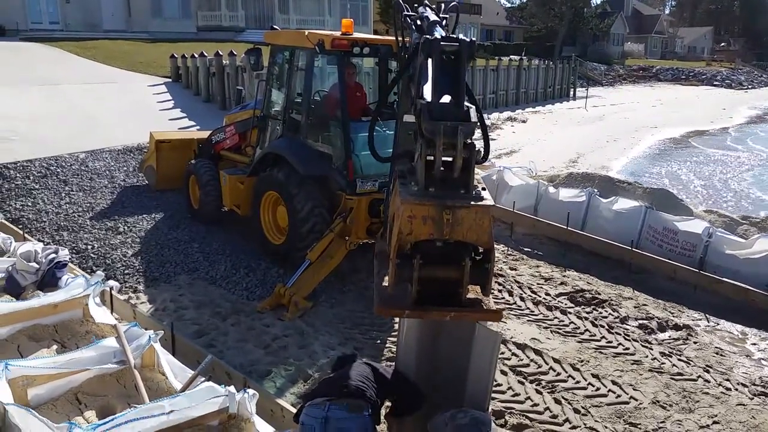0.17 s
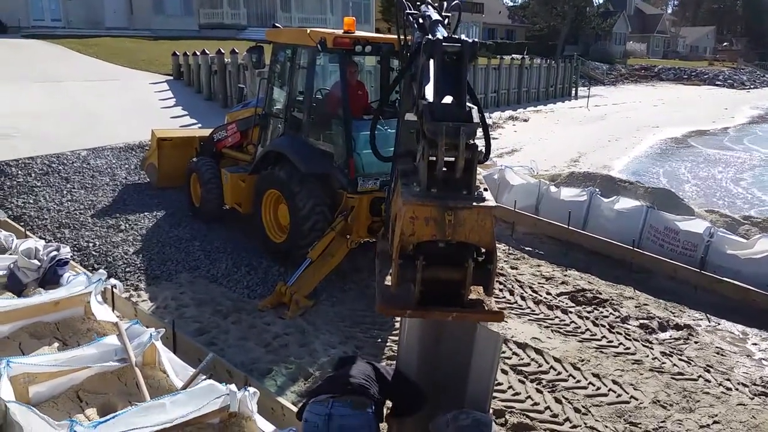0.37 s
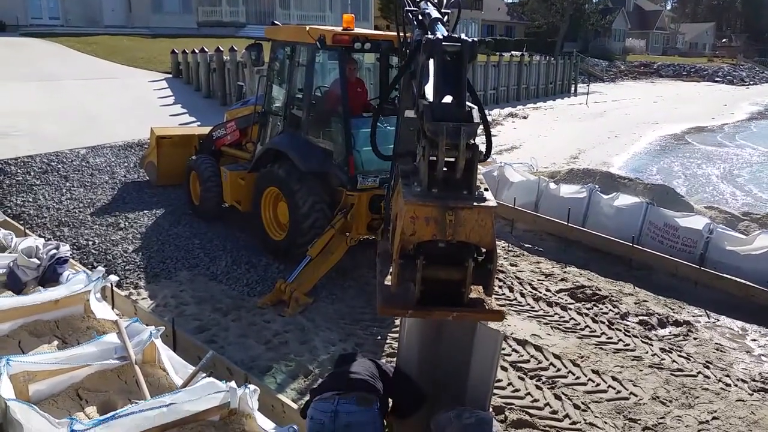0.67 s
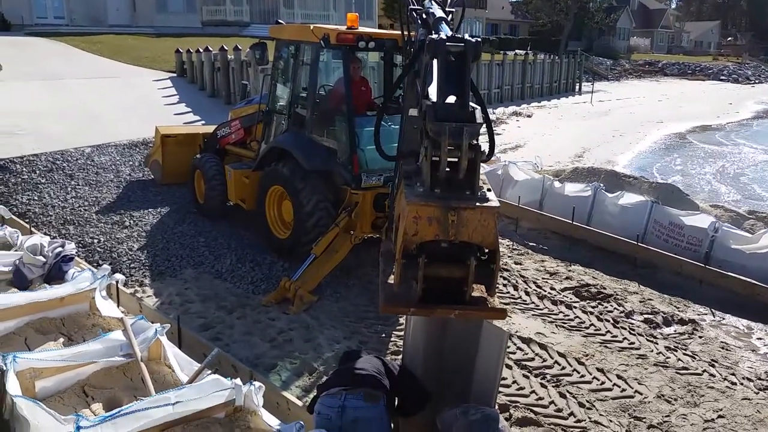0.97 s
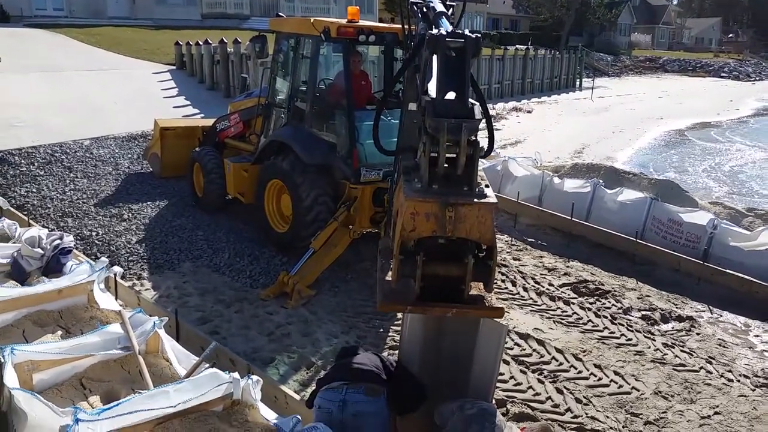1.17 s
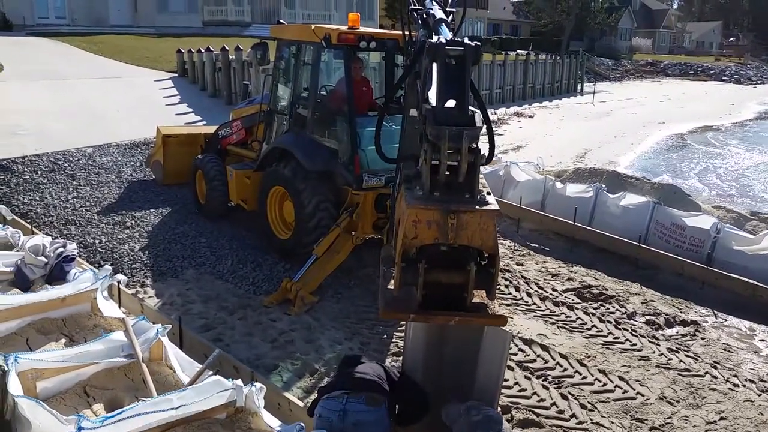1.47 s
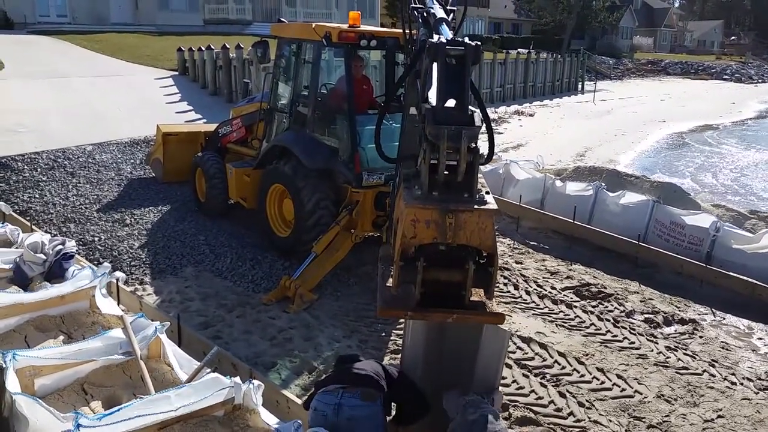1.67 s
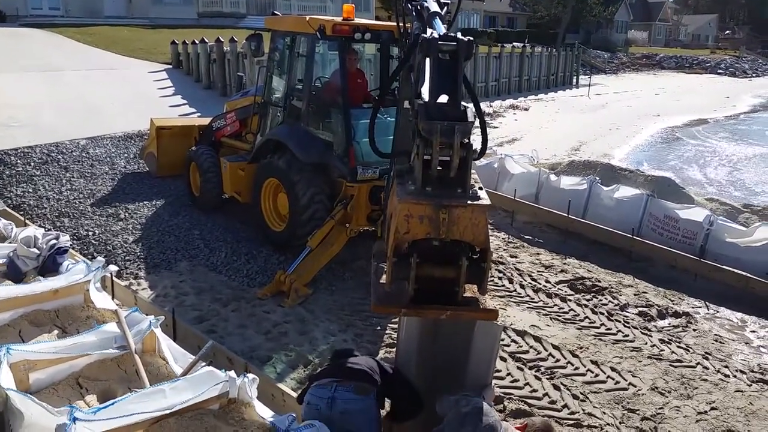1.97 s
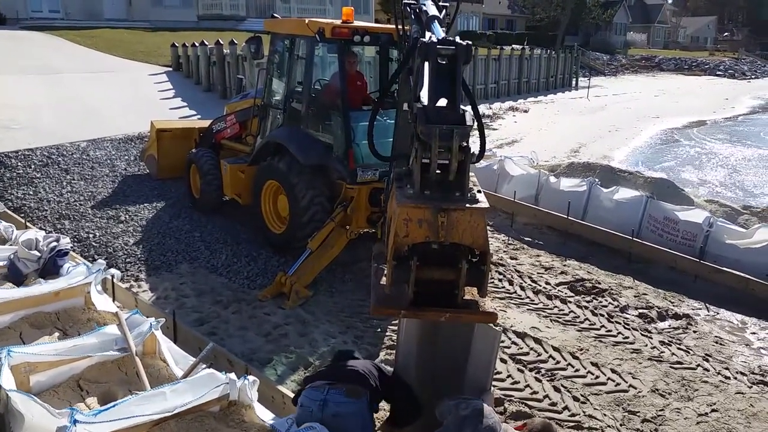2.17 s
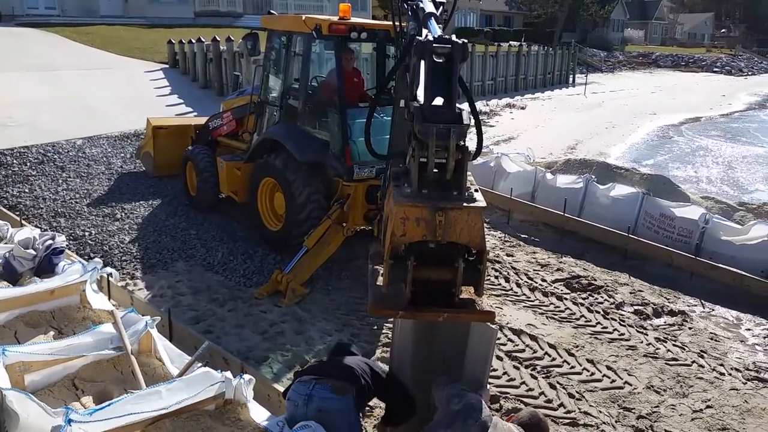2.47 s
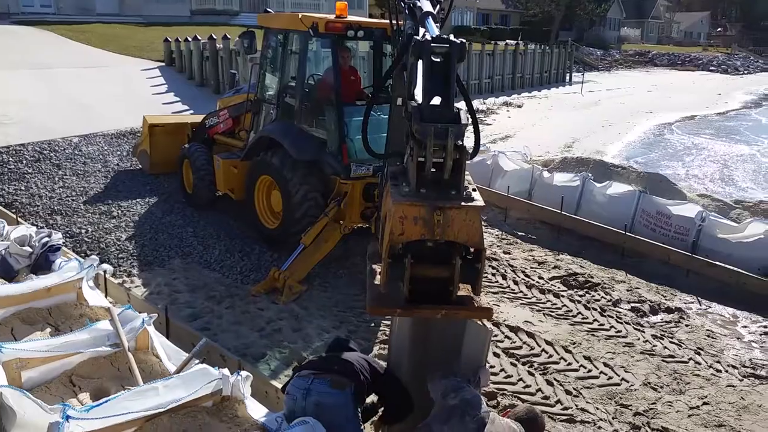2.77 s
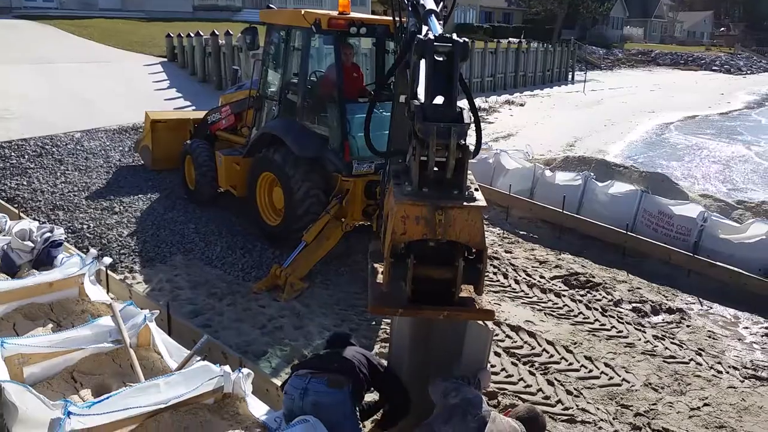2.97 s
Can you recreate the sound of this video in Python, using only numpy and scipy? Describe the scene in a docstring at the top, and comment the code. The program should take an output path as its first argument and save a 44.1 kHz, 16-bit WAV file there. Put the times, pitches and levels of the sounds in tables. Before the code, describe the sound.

A vibrating plate drives sheet steel into sand throughout, with dull low thuds about seventeen times a second, slightly irregular. Harsh bright rattling, sizzle and thin ringing clanks run densely until 1.3 seconds, thin out until about 1.9, then return, with strong clanks around 2.4-2.6, continuing to the end at 3.1. A diesel drones and roars steadily beneath; low wind buffeting slowly eases. Dry, open-air, close stereo sound, left treble differently coloured.

```python
"""Vibrating plate driving sheet steel

A vibrating plate on a backhoe arm drives steel sheet into a beach. Each landing excites a low ground resonance;
loose steel rattles as noise under sizzle, chatter and clank envelopes, and rings in narrow modes.
The diesel is shaped noise, an exhaust drone and a roar of panels; wind rumbles separately on two microphone
ports, which colour the treble very differently."""
import sys
import numpy as np
from scipy import signal
from scipy.fft import rfft, irfft, next_fast_len
from scipy.io import wavfile
from scipy.ndimage import uniform_filter1d, map_coordinates

SR = 44100
rng = np.random.default_rng(int(sys.argv[2]) if len(sys.argv) > 2 else 0)


def gain_from_db(level_db):
    """Turn a decibel level (scalar or array-like) into a linear amplitude factor."""
    decades = np.asarray(level_db, float) / 20
    return 10 ** decades


def int16_out(signal):
    """Quantize to a 16-bit WAV file."""
    q = np.round(np.clip(np.atleast_2d(signal).T, -1, 1) * 32767)
    wavfile.write(sys.argv[1], SR, q.astype(np.int16))


N = 137151  # samples, 3.11 s


def unit(x):
    """Normalisation: scales a signal to rms 1."""
    return x / np.sqrt(np.mean(x ** 2) + 1e-20)


def along(points, hz, column=1):
    """Interpolation: reads a column of a table on a log frequency axis."""
    p = np.transpose(points)
    return np.interp(np.log(hz + 1), np.log(p[0] + 1), p[column])


def wobble(rate):
    """Slow random modulation: a spline through random knots, rate of them a second."""
    knots = rng.standard_normal(int(N * rate / SR) + 4)
    return map_coordinates(knots, [np.arange(N) * rate / SR])


def filtered(x, response):
    """Linear filtering: multiplies the spectrum by a complex response of frequency."""
    m = next_fast_len(N + SR // 2)
    return irfft(rfft(x, m) * response(np.fft.rfftfreq(m, 1 / SR)), m)[..., :N]


def peak(f, hz, width_hz):
    """Damped oscillator: the causal response of one resonance, 1 at its centre."""
    return 1j * f * width_hz / (hz * hz - f * f + 1j * f * width_hz)


def impulses(s, db):
    """Ideal impacts: single samples at the given times."""
    at = np.clip(np.round(np.asarray(s) * SR).astype(int), 0, N - 1)
    return np.bincount(at, gain_from_db(db) * np.ones(len(at)), N)


def bursts(s, db, rise_s, t60_s):
    """Exponential decay: the power of blows that rise fast and die away."""
    t = np.arange(SR // 4) / SR
    pressure = (1 - np.exp(-t / rise_s)) * gain_from_db(-60 * t / t60_s)
    return signal.fftconvolve(impulses(s, 2 * db), pressure ** 2)[:N]


def noise(spectrum, patchy_db):
    """Spectral shaping: two unrelated paths of coloured noise sharing patches of random gain."""
    z = signal.stft(rng.standard_normal((2, N)), nperseg=512)[2]
    field = uniform_filter1d(rng.standard_normal(z.shape[1:]), 6, 0)  # smooth over frequency
    field = uniform_filter1d(field, 10, 1)  # and over time
    pair = signal.istft(z * gain_from_db(patchy_db * unit(field)), nperseg=512)[1][:, :N]
    top_hz = spectrum[-1][0] + 200
    return unit(filtered(pair, lambda hz: gain_from_db(along(spectrum, hz)) * (hz <= top_hz)))


RING_WAVER_DB, RING_WAVER_PER_S = 4, 14  # random coupling of each mode


def ringing(x, modes):
    """Modal superposition: x plus its modes, each coupled to the shaking now more, now less."""
    total = x
    for hz, width_hz, db in modes:
        coupling = gain_from_db(db + RING_WAVER_DB * wobble(RING_WAVER_PER_S))
        total = total + filtered(x * coupling, lambda f: peak(f, hz, width_hz))
    return total


# spectrum of the wind on the ports: (frequency [Hz], relative density [dB per Hz])
WIND_SPECTRUM = [(15, -40), (30, -19), (60, 5), (100, 3), (300, -32.5)]
WIND_START_DB, WIND_FADE_DB_PER_S, WIND_WAVER_DB = -21, 1.3, 1.2


def wind():
    """Turbulent pressure: low buffeting, unrelated at the two ports, slowly easing."""
    waver_db = WIND_WAVER_DB * np.array([wobble(3), wobble(3)])
    level_db = WIND_START_DB - WIND_FADE_DB_PER_S * np.arange(N) / SR + waver_db
    return gain_from_db(level_db) * noise(WIND_SPECTRUM, patchy_db=1.5)


# spectrum of the exhaust: (frequency [Hz], relative density [dB per Hz])
DRONE_SPECTRUM = [(20, -99), (60, -57), (100, -16), (170, 0), (235, -2.5), (270, -17.5), (360, -11.5),
                  (420, -30.5), (600, -70)]
DRONE_DB = -19.5  # at mean load, between dips
DRONE_FOLLOWS = 0.15  # dB of drone per dB of plate force
EVEN_S = .03  # averaging time of the levelling
DIP_S, DIP_SHARE = .016, .7  # half length of a dip, share of the amplitude lost


def drone():
    """Band-limited noise of near-constant power: exhaust, louder under load, dipping around landings."""
    rush = noise(DRONE_SPECTRUM, patchy_db=1.5)
    load_db = np.interp(np.arange(N) / SR, *np.transpose(PLATE_FORCE))
    dip_shape = np.hanning(int(2 * DIP_S * SR))
    dips = signal.fftconvolve(impulses(LANDINGS, 0), dip_shape, "same").clip(0, 1)
    power = np.abs(uniform_filter1d(rush ** 2, int(EVEN_S * SR)))
    even = unit(rush / np.sqrt(power + 0.13))
    level_db = DRONE_DB + DRONE_FOLLOWS * (load_db - load_db.mean())
    return gain_from_db(level_db) * even * (1 - DIP_SHARE * dips)


# spectrum of the engine block and fan: (frequency [Hz], relative density [dB per Hz])
ROAR_SPECTRUM = [(300, 3.5), (500, -8.5), (650, -2.5), (800, -4), (1250, -11), (1500, -5.5), (1850, 1.5),
                 (2100, -4.5), (2300, -8), (2500, -16), (3300, -19), (5000, -16), (8000, -90)]
# ringing engine panels: (frequency [Hz], width [Hz], level over the roar [dB])
PANEL_MODES = [(1024, 34, 8.5)]
ROAR_DB = -17.5  # before shaking and panel ringing
ROAR_FOLLOWS = 0.38  # dB of roar per dB of steel looseness
ROAR_CLATTER = 0.24  # exponent on the rattle envelope


def engine(loose_db, level):
    """Amplitude modulation: a roar that partly shakes with the rattle and excites panel resonances."""
    clatter = unit(level / gain_from_db(loose_db)) ** ROAR_CLATTER
    shaking = clatter * gain_from_db(ROAR_FOLLOWS * (loose_db - loose_db.mean()))
    roar = gain_from_db(ROAR_DB) * shaking * noise(ROAR_SPECTRUM, patchy_db=1.0)
    return filtered(roar, lambda f: 1 + sum(gain_from_db(db) * peak(f, hz, width) for hz, width, db in PANEL_MODES))


# how freely the steel rattles: (time [s], level [dB])
LOOSENESS = [(0, -23.5), (.15, -24), (.45, -22), (.85, -22.5), (1.1, -23.5), (1.33, -24), (1.36, -32.5),
             (1.43, -32), (1.5, -28), (1.85, -29), (1.95, -24), (2.3, -22), (2.45, -23.5), (2.8, -22),
             (3.11, -21.5)]
# clanks of loose steel, from loud to inaudible:
# (time [s], nominal peak level before colouring and scatter [dB])
STEEL_CLANKS = [(0.0044, -5.5), (0.245, -7.5), (0.313, -12), (0.4105, -12), (0.466, -5.5), (0.351, -9),
                (0.5546, -8), (0.653, -6), (0.7384, -9), (0.834, -6), (0.858, -6.5), (0.892, -7.5),
                (0.955, -6), (1.082, -10.5), (1.113, -12), (1.17, -12), (1.4395, -13), (1.505, -9),
                (1.578, -12), (1.793, -13), (1.943, -40), (2.0323, -61), (2.097, -12), (2.1605, -41),
                (2.2226, -7), (2.2653, -11), (2.353, -10.5), (2.4395, -3), (2.5073, -4.5), (2.5685, -3.5),
                (2.634, -11), (2.728, -13.5), (2.782, -8), (2.84, -7), (2.887, -12), (3.011, -7.5),
                (3.0649, -11)]
SIZZLE_DB = -4  # relative to looseness
CHATTER_PER_S, CHATTER_T60_S = 130, .03
CHATTER_DB, CHATTER_SPREAD_DB = -2, 10  # weakest blow relative to looseness, range above it
CLANK_CREST_DB, CLANK_SCATTER_DB, CLANK_T60_S = 7, 1.5, .085


def rattling(rise_s):
    """Addition of powers: steady sizzle, random chatter and clanks set the level of loose steel."""
    loose_db = np.interp(np.arange(N) / SR, *np.transpose(LOOSENESS))
    draw = rng.random((int(CHATTER_PER_S * N / SR), 2))
    chatter_db = CHATTER_DB + CHATTER_SPREAD_DB * draw[:, 1]
    chatter = bursts(draw[:, 0] * N / SR, chatter_db, rise_s, CHATTER_T60_S)
    s, peak_db = np.transpose(STEEL_CLANKS)
    clank_db = peak_db - CLANK_CREST_DB + CLANK_SCATTER_DB * rng.standard_normal(len(s))
    clanks = bursts(s, clank_db, rise_s, CLANK_T60_S)
    power = gain_from_db(2 * loose_db) * (gain_from_db(2 * SIZZLE_DB) + chatter) + clanks
    return loose_db, np.sqrt(np.abs(power))


# colour of the rattle: (frequency [Hz], relative density [dB per Hz])
STEEL_SPECTRUM = [(1500, -40), (2600, -10), (3300, -10), (4200, -2), (5300, -2.5), (6500, -6.5),
                  (7200, -10), (8500, -8), (9300, -4), (10300, 1), (11000, -4), (11800, -9), (13000, -10.5),
                  (14000, -12), (15600, -18)]
# ringing modes of the steel: (frequency [Hz], width [Hz], mean level over the colour [dB])
STEEL_MODES = [(2290, 60, 6), (4428, 60, -1), (4590, 70, -3), (5400, 55, -4), (13161, 45, 10.5),
               (13340, 50, 4), (15225, 70, 13.5)]
SMALL_PARTS_HZ = 11200  # small parts sound above this


def steel(level, small_level):
    """Forced vibration: scraping contacts of large parts, and of small ones on top, keep the modes ringing."""
    rush = noise(STEEL_SPECTRUM, patchy_db=1.0)
    top = lambda f: 1 / (1 + (SMALL_PARTS_HZ / (f + 1)) ** 12)
    large_parts = filtered(level * rush, lambda f: 1 - top(f))
    small_parts = filtered(small_level * rush, top)
    return ringing(large_parts + small_parts, STEEL_MODES)


# hard landings of the plate, mostly on every second shake: (time [s])
LANDINGS = [.002, .055, .122, .178, .237, .296, .42, .482, .543, .641, .702, .763, .828, .883, .912, 1.044,
            1.077, 1.107, 1.14, 1.223, 1.283, 1.345, 1.401, 1.453, 1.503, 1.56, 1.602, 1.7, 1.762, 1.822,
            1.869, 1.896, 1.949, 2.01, 2.071, 2.151, 2.211, 2.245, 2.275, 2.341, 2.403, 2.462, 2.525, 2.59,
            2.652, 2.713, 2.774, 2.831, 2.893, 2.955, 3.015, 3.08]
# force of the plate on the sheet: (time [s], thud peak level before scatter [dB])
PLATE_FORCE = [(0, -8), (1.1, -9), (1.5, -10.5), (2.1, -7.5), (2.7, -8.5), (2.95, -13.5)]
THUD_LEAD_S, THUD_SCATTER_DB = .005, 1.2  # the push starts before the thud peaks
REBOUND_S, REBOUND_DB = .031, -7.5  # after the landing, relative to its force
GROUND_HZ, GROUND_WIDTH_HZ = 169.4, 208


def plate():
    """Impulse response: each landing is a short low push or pull; a weaker rebound fills a skipped shake."""
    s = np.array(LANDINGS) - THUD_LEAD_S
    force_db = np.interp(s, *np.transpose(PLATE_FORCE))[:, None]
    db = force_db + THUD_SCATTER_DB * rng.standard_normal((len(s), 2))
    skipped = np.diff(s, append=N / SR) > 1.5 * REBOUND_S
    landings = impulses(s, db[:, 0])
    rebounds = impulses(s[skipped] + REBOUND_S, db[skipped, 1] + REBOUND_DB)
    push = (landings + rebounds) * np.sign(rng.standard_normal((2, N)))
    body = lambda f: peak(f, GROUND_HZ, GROUND_WIDTH_HZ) ** 4
    single_peak = np.abs(filtered(impulses([0], 0), body)).max()
    return filtered(push, body) / single_peak * [[1], [.5]]  # the second path is half as strong


# left port against right: (frequency [Hz], level [dB], likeness [-1 to 1])
LEFT_COLOUR = [(60, 0, .7), (170, -2, .8), (350, -5, .76), (500, -6.5, .7), (800, -6, .92), (1250, -6, .55),
               (1850, -8, .8), (2300, -3, .55), (3000, -13, -.3), (4500, -18, .7), (6000, -16, .5),
               (7300, -7, -.45), (8050, -23, .1), (8800, -10, .5), (10300, -5, .55), (11000, 3, .65),
               (12000, 10, -.4), (12600, 9, -.65), (13600, 0, .3), (15200, -1, .65)]
LEFT_LAG_S = 3.5e-5  # applied below 3 kHz


def ports(paths):
    """Partial coherence: right hears the first path; left, slightly late, a coloured mix of both."""
    alike = lambda f: np.clip(along(LEFT_COLOUR, f, column=2), -1, 1)
    lag = lambda f: np.exp(-2j * np.pi * f * LEFT_LAG_S * (f < 3000))
    gain = lambda f: gain_from_db(along(LEFT_COLOUR, f)) * lag(f)
    left = filtered(paths, lambda f: gain(f) * np.array([alike(f), np.sqrt(1 - alike(f) ** 2)]))
    return np.array([left.sum(axis=0), paths[0]])


def scene():
    """Superposition: all sources add at the two ports."""
    loose_db, level = rattling(rise_s=.0006)
    # small parts share the clanks, with their own random chatter and clank scatter
    _, small_level = rattling(rise_s=.002)
    machine = drone() + engine(loose_db, level)
    return wind() + ports(machine + steel(level, small_level) + plate())


def band_limit(x):
    """A steep low-pass at the top of the band."""
    return signal.sosfilt(signal.butter(12, 15910, fs=SR, output="sos"), x)


def record(dry):
    """Band limitation: nothing passes above a sharp upper edge."""
    mix = filtered(dry, lambda f: f < 15850)  # Hz
    return band_limit(mix)


dry = scene()
out = record(dry)
int16_out(out)
```